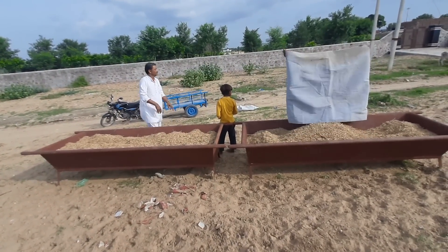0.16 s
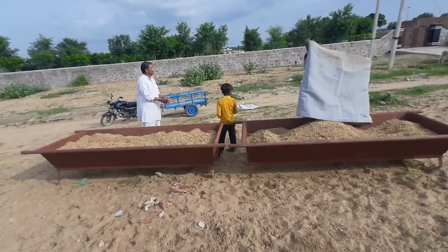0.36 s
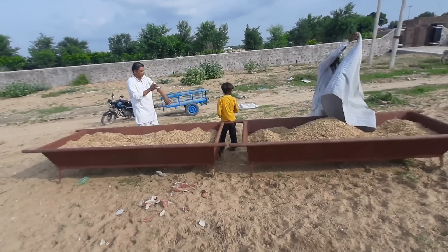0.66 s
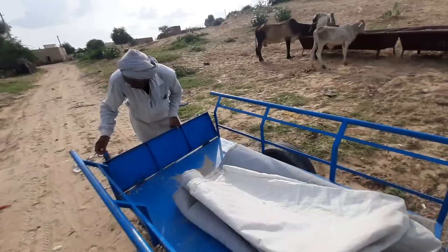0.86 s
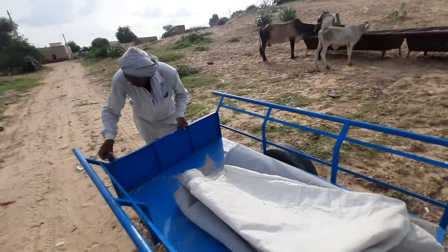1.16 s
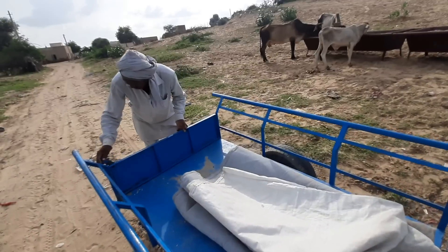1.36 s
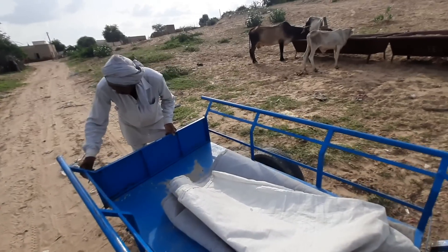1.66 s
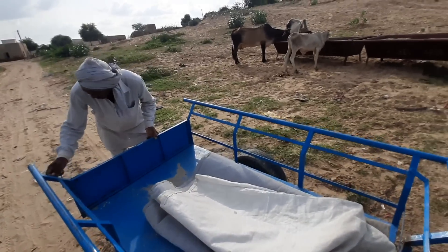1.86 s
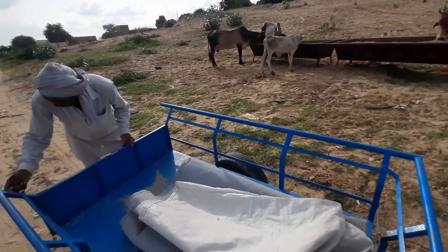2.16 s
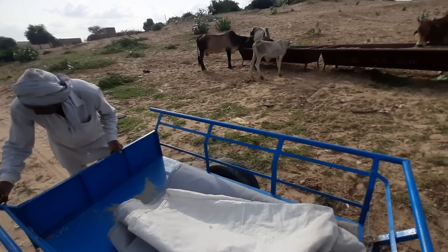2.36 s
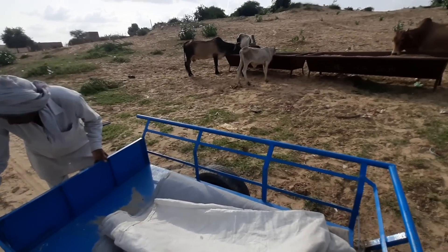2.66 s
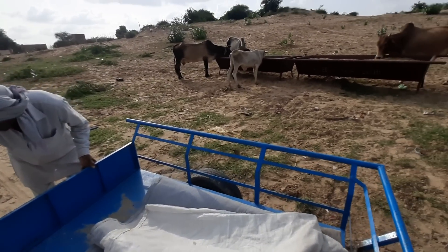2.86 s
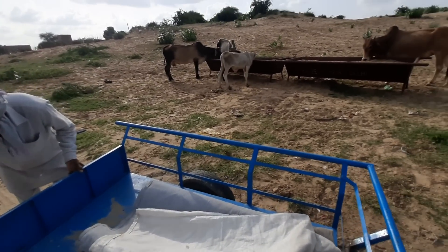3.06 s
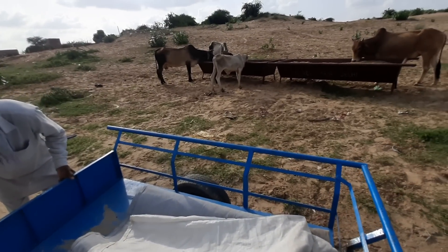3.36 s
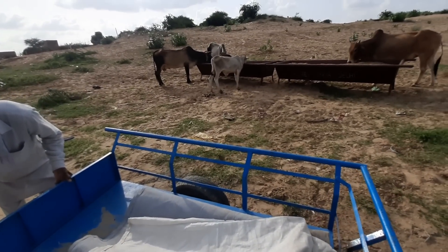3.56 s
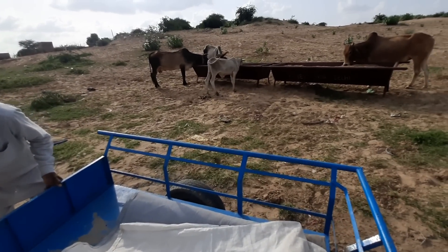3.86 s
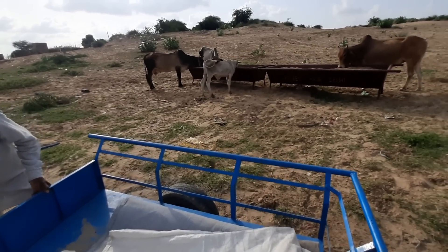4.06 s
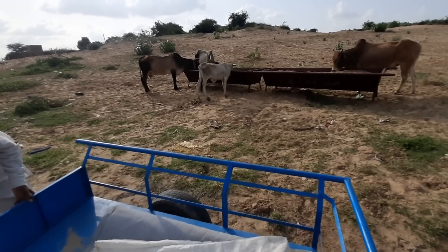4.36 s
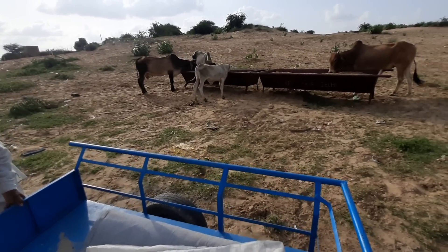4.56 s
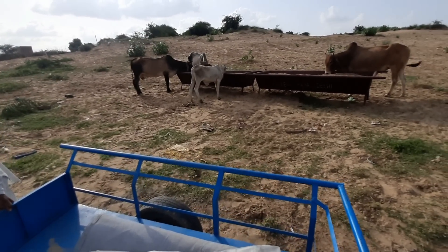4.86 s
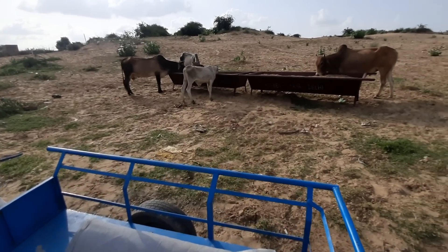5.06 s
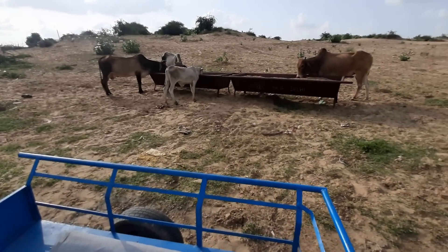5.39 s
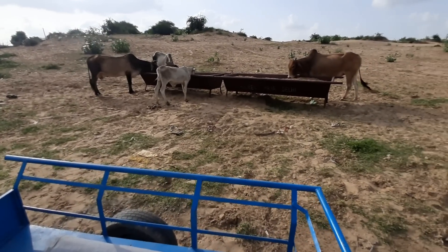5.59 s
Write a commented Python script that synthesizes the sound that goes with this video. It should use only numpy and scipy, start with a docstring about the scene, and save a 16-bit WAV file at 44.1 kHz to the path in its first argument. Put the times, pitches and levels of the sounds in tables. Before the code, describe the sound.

A tarpaulin rustles briefly, then a steel hand cart rattles, clanks and rumbles as it is pushed over rough sand.

```python
"""Tarpaulin, then hand cart

Scene 1: a tarpaulin is shaken out in a yard; weave rustles, creases snap, folds slap. A far engine
revs once, sparrows chirp. Scene 2: a steel hand cart is pushed over rough sand. Wheels rumble, grit
hisses, the bed drones; blows ring sheet, rails, tailgate and axle bar. Far birds cry."""
import sys
import numpy as np
from scipy import signal
from scipy.fft import rfft, irfft, next_fast_len
from scipy.io import wavfile
from scipy.ndimage import uniform_filter1d

SR = 44100
rng = np.random.default_rng(int(sys.argv[2]) if len(sys.argv) > 2 else 0)


def write(x):
    x = np.atleast_2d(x).T
    wavfile.write(sys.argv[1], SR, np.round(np.clip(x, -1, 1) * 32767).astype(np.int16))


N = 252693

YARD_END_S, CART_START_S = 0.7973, 0.818

# Levels are relative within a layer; spectra are densities.
# tarpaulin motion: t/s, rustle/dB, flap/dB
TARP_LEVELS = [(0.0, -67.5, -59), (0.08, -70.5, -60.5), (0.164, -59.5, -56), (0.264, -71.5, -59.5),
               (0.44, -52.5, -53.5), (0.5, -48.5, -56), (0.576, -65.5, -57.5), (0.72, -67, -50),
               (0.79, -47, -49)]
# weave and cloth body: f/Hz, level/dB
RUSTLE_SPECTRUM = [(590, -43), (1000, 0), (1220, -1), (1770, 4), (5250, -2), (5900, -9.5), (8960, -4),
                   (14600, -13), (16000, -20)]
FLAP_SPECTRUM = [(120, -30), (200, 6.5), (302, -8), (361, -13.5), (640, -3.5), (1040, -15.5), (1170, -11.5),
                 (1500, -16.5), (1950, -52), (3300, -120)]
# engine wash: f/Hz, level/dB
ENGINE_SPECTRUM = [(40, -50), (100, 2.5), (250, -7.5), (500, -17.5), (1000, -64)]
# sparrows: start/s, length/s, top f/Hz, level/dB
SPARROW_CHIRPS = [(0.07, 0.087, 5480, -68.5), (0.311, .09, 5480, -71), (0.559, 0.07, 5000, -71)]
# creases: t/s, level/dB
CREASE_SNAPS = [(0.1542, -49.5), (0.4581, -14.5)]
# cloth on cloth: t/s, level/dB, f/Hz
FOLD_SLAPS = [(0.202, -46.5, 676), (0.522, -36.5, 301), (0.654, -56, 550), (0.685, -38.5, 650),
              (0.739, -49, 750)]
# wheels on sand: t/s, rumble/dB, grit/dB
ROLL_LEVELS = [(0.82, -53, -60), (1.05, -52.5, -60.5), (1.19, -37, -47), (1.35, -42.5, -50),
               (1.5, -46.5, -57), (1.9, -51.5, -57.5), (2.05, -53, -63), (2.76, -56, -62),
               (3.05, -45.5, -59), (3.25, -44.5, -59.5), (3.55, -52, -57.5), (3.66, -43, -52),
               (4.09, -55, -67.5), (4.42, -42, -53.5), (4.58, -44.5, -65.5), (4.94, -42.5, -57),
               (5.28, -51, -74.5), (5.46, -46, -70), (5.73, -54.5, -74)]
# wheels and sand: f/Hz, level/dB
RUMBLE_SPECTRUM = [(12, -46.5), (20, -35), (91, 11), (117, 4), (134, -23), (236, -30.5), (258, -24),
                   (292, -11), (400, -38.5), (520, -60), (880, -120)]
GRIT_SPECTRUM = [(88, -33.5), (150, -13), (179, -21), (217, -7), (398, -16.5), (439, -30.5), (534, -28.5),
                 (1480, -39.5), (2310, -43.5), (8900, -48), (16000, -62)]
THUD_SPECTRUM = [(20, -28.5), (45, -2), (80, 3.5), (130, -9.5), (300, -60)]
# bumps: t/s, level/dB
WHEEL_THUDS = [(1.309, -41), (3.091, -34), (4.94, -35), (5.45, -44)]
# left-right coherence: f/Hz, coherence/1
RUMBLE_COHERENCE = [(25, 0.38), (60, 0.7), (150, 0.9)]
CLANK_COHERENCE = [(60, .9), (180, .995), (350, .99), (700, .96), (1200, .7), (2500, .6), (5000, .75),
                   (8000, .85)]
# bed panel swells: peak t/s, level/dB, f/Hz, swell/s, t60/s
BED_SWELLS = [(0.85, -38.5, 208, 0.066, 0.23), (.97, -46.5, 215, 0.068, 1.2),
              (1.145, -24, 214.4, 0.089, 1.2), (1.223, -22, 206, .04, 0.12), (1.341, -26, 234, .05, 0.38),
              (1.431, -33.5, 212.4, .04, 0.24), (1.52, -32.5, 198, 0.05, 0.27),
              (1.69, -20, 220, 0.021, 0.13), (1.8, -41, 213.7, .02, 0.65),
              (2.33, -35.5, 221.2, 0.031, 0.85), (2.375, -37.5, 230, .04, 0.086),
              (2.51, -37.5, 221.2, 0.043, .35), (3.05, -43.5, 215, 0.045, 0.71),
              (3.23, -26, 214.5, 0.12, 0.24), (3.4, -39, 217, 0.044, 0.46), (3.61, -32.5, 210, 0.036, 0.41),
              (4.22, -27, 216, 0.028, 1), (4.409, -36.5, 219, 0.076, 0.33),
              (4.95, -12, 189.6, 0.024, 0.039), (5.0, -28, 196, .02, 0.36)]
# blows: t/s, clang/dB, boom/dB, jangle/dB, top-octave loss/dB, lean from tailgate to rails/dB,
# treble damping/(dB per 0.1 s, sign ignored)
CART_BLOWS = [(0.9012, -70, -39, -55.5, 12, 4.5, 20), (1.163, -41, -16, -34, 16, 8.5, 11),
              (1.1839, -24, -10.5, -25, 7, -9.5, -3), (1.1998, -18.5, -24.5, -10, 13, -12, 0),
              (1.2107, -38, -16, -24, 25, -1, 8), (1.2589, -23.5, -23, -22.5, 17, 0, 11),
              (1.3215, -41, -25, -35, 30, 6, -6), (1.3789, -49.5, -32, -37, 25, 5, 31),
              (1.431, -38, -34, -50, 33, -12, 26), (1.5094, -32, -25, -36, 27, -12.5, 17),
              (1.5322, -42, -46, -45, 6, -6, -5), (1.558, -40, -43.5, -46, 32, -15, 5),
              (1.61, -36.5, -27.5, -30.5, 23.5, 2, 20), (1.6786, -20.5, -19.5, -15, 7, 10, 6.5),
              (1.7005, -22, -22.5, -14.5, 20.5, -13.5, 19), (1.7386, -39, -21, -34.5, 27, -0.5, 22.5),
              (2.3098, -46.5, -29.5, -35.5, 16.5, -0.5, 4), (2.4723, -35, -35, -26, 10.5, 4, 9.2),
              (3.0191, -34, -20, -35.5, 7, -2.5, 12), (3.0487, -43, -32, -56, 25, 7.5, 9),
              (3.1006, -33, -36, -25, 23, 2.5, 20), (3.1372, -33, -29, -33, 46, 4, 2),
              (3.175, -30, -29, -34, 18, -13.5, 11), (3.1942, -31.5, -22.5, -33.5, 39, -11.5, 23),
              (3.2648, -54, -32, -65, -2.5, -17, 5), (3.3794, -41.5, -29.5, -51.5, 3, 3, 4.5),
              (3.502, -49.5, -40, -42.5, 5, 2, 5), (3.5834, -40, -27, -38, 15, -4, 9),
              (3.864, -66.5, -69, -56.5, 16.5, 2, 6.5), (4.2046, -30, -22.5, -21, 20.5, -4, 12.5),
              (4.354, -41, -26, -43, 14, -2, 6), (4.5103, -68, -42, -55, 8.5, 6, 4),
              (4.6122, -53, -42, -36, 8, 1, 16), (4.7638, -59, -59.5, -52.5, 6, -2.5, 11),
              (4.9163, -29, -21.5, -8.5, 6.5, 3, 13), (4.934, -17, -21.5, -21.5, 26, 1.5, 21),
              (4.9498, -23, -21.5, -15, 29, -2.5, 10), (5.0174, -42.5, -29, -35.5, 17, 12, 3),
              (5.0728, -43.5, -37.5, -43, 10, 9, 16.5), (5.099, -61, -31.5, -47.5, 11, -0.5, 10),
              (5.2673, -89.5, -46, -60.5, 20, -5.5, 10.5)]
# envelope of the dense sheet modes: f/Hz, level/dB, t60/s before blow damping
SHEET_RESPONSE = [(121, -4.5, 0.8), (257, -0.5, 0.91), (464, 1.5, 0.49), (1140, 9.5, 0.3), (2200, 7, 0.35),
                  (3500, 0, 0.23), (4407, -4, 0.18), (6000, -2, .15), (8300, 6, 0.15), (14000, 4.5, 0.13),
                  (16000, -17.5, .08)]
# frame modes: f/Hz, level/dB, t60/s before blow damping
RAIL_MODES = [(183, -1, .45), (213, 0, .5), (260, -4, .35), (305, -4, .35), (452, -6, .4), (705, -4, .3),
              (915, -8, .25), (1125, -9, .22), (1780, -8, .14), (1884, -10, .2), (2503, -8, .13),
              (2902, -10, .14), (3550, -6, .07), (3740, -8, .08), (5265, -10, .09), (6848, -10, .09),
              (8050, -8, .07), (9300, -8, .07)]
GATE_MODES = [(328, -4, .35), (375, -3, .4), (527, -5, .3), (709, -4, .3), (1055, -6, .22),
              (1342, -10, .22), (1379, -8, .22), (2220, -11, .18), (2675, -12, .18), (2947, -11, .15),
              (7503, -10, .12), (8555, -2, .13), (10270, -6, .16)]
# right-channel lag as the cart moves left: t/s, lag/ms
RIGHT_LAG = [(.8, .2), (3, .27), (5.7, .41)]
# steel on steel: start/s, end/s, end level/dB
STEEL_SCRAPES = [(1.175, 1.203, -21), (3.128, 3.193, -33), (3.366, 3.375, -49), (4.178, 4.214, -28.5),
                 (4.326, 4.36, -38), (4.908, 4.916, -43)]
# steel friction: f/Hz, level/dB
SCRAPE_SPECTRUM = [(300, -23), (900, -5), (2200, 1), (3500, -2.5), (5000, -17.5), (9000, -14.5),
                   (14000, -27)]
# latch pins and links: t/s, f/Hz, level/dB
PIN_CLINKS = [(1.314, 3050, -33.5), (2.312, 5600, -48), (3.103, 3010, -31), (3.105, 3600, -31.5),
              (3.191, 3700, -43), (3.504, 9000, -51), (4.186, 1810, -35), (4.207, 3400, -35),
              (5.072, 1790, -36.5), (5.268, 4690, -64.5)]
# far birds: start/s, length/s, top f/Hz, level/dB
FAR_CRIES = [(1.836, 0.22, 1750, -66), (2.072, 0.25, 1700, -75), (2.564, 0.2, 1740, -65),
             (2.707, 0.24, 1780, -67), (3.68, 0.26, 2050, -68), (3.927, 0.17, 2150, -78),
             (4.45, 0.16, 1850, -72), (4.602, 0.12, 2060, -64.5), (4.749, .15, 1800, -71),
             (5.198, 0.23, 1700, -79), (5.611, 0.17, 1880, -69.5)]
# blur around the cries: f/Hz, level/dB
CRY_SPECTRUM = [(900, -32.5), (1250, -7.5), (1800, 0.5), (2250, -5.5), (2700, -27.5)]
# hollow knock: t/s, level/dB
HOLLOW_KNOCKS = [(2.7, -41.5)]
# hollow part and axle bar modes: f/Hz, level/dB, t60/s
HOLLOW_MODES = [(590, -13.5, 0.24), (840, -5.5, 0.34), (1010, 6.5, 0.19), (1130, 0, 0.29),
                (1100, -1.5, 0.31), (1240, -6, 0.12), (1376, -4.5, .12), (1600, -12, 0.091)]
AXLE_MODES = [(1502, -6, .5), (4452, -12, .45), (4470, -16, .4), (5987, 0, .17)]
# blows on the axle bar: t/s, level/dB, top-mode gain/dB
AXLE_BLOWS = [(4.6148, -62.5, -23), (4.922, -32.5, 12)]
# one bird's falling call: t/s, f/Hz, level/dB
FALLING_CALL = [(5.22, 1863, -77.5), (5.308, 1857, -85), (5.354, 1695, -77.5), (5.52, 1560, -94)]
# stereo balance: f/Hz, left minus right/dB
STEREO_TILT = [(60, -0.5), (110, -0.5), (200, -0.5), (380, 0.5), (700, 0.5), (1290, -2.5), (2380, 0.5),
               (4400, -4), (8120, -4.5), (15000, 14)]


def amp(db):
    return 10 ** (np.asarray(db) / 20)


def unit_rms(x):
    return x / np.sqrt(np.mean(x ** 2) + 1e-20)


def at_hz(table, hz, column=1):
    """Table column, interpolated over log frequency."""
    table = np.array(table)
    return np.interp(np.log(hz + 1), np.log(table[:, 0] + 1), table[:, column])


def track(table):
    """Columns of a time table, per sample."""
    times_s, *columns = np.transpose(table)
    return [np.interp(np.arange(N) / SR, times_s, c) for c in columns]


def add(mix, at_s, sound):
    part = mix[:, round(at_s * SR):][:, :sound.shape[1]]
    part += sound[:, :part.shape[1]]


def stereo(left, other, coherence):
    return np.array([left, coherence * left + np.sqrt(1 - coherence ** 2) * other])


def noise(spectrum, coherence, size=512, patchy_db=-0.5, flicker_db=0):
    """Coloured stereo noise with drifting patches and wide-band flicker."""
    hop = size // 4
    hz = np.fft.rfftfreq(size, 1 / SR)
    a, b, c, d, patches = rng.standard_normal((N // hop + 5, len(hz), 5)).T
    flicker = patches[0]
    patches = unit_rms(uniform_filter1d(uniform_filter1d(patches, 8, axis=0), 12, axis=1))
    bins = stereo(a + 1j * b, c + 1j * d, np.reshape(coherence, (-1, 1)))
    bins *= amp(at_hz(spectrum, hz)[:, None] + patchy_db * patches + flicker_db * flicker)
    return unit_rms(signal.istft(bins, nperseg=size, noverlap=size - hop)[1][:, :N])


def swell(peak_s, db, swell_s, t60_s):
    """Gain: quadratic rise, exponential decay."""
    t = np.arange(N) / SR - peak_s
    return amp(db - 60 * np.maximum(t, 0) / t60_s) * np.clip(1 + t / swell_s, 0, 1) ** 2


def ring(modes, t):
    """Decaying sines, random phases."""
    return sum(amp(db - 60 * t / t60_s) * np.sin(2 * np.pi * (hz * t + rng.random()))
               for hz, db, t60_s in modes)


def arched_note(start_s, length_s, hz, db, arch, rise_db, fall_db, top=0.55):
    """Pitch and level climb, then sink. Rows: t/s, f/Hz, level/dB."""
    return [(start_s, hz * (1 - arch), db - rise_db),
            (start_s + top * length_s, hz, db),
            (start_s + length_s, hz * (1 - 1.4 * arch), db - fall_db)]


def note_gain(note):
    t = np.arange(N) / SR
    inside_s = np.minimum(t - note[0][0], note[-1][0] + 0.025 - t)
    return amp(track(note)[1]) * np.clip(inside_s / 0.017, 0, 1)


def fuzzy_tone(notes, width_hz):
    """Narrow noise band following the notes."""
    hz = track(np.concatenate(notes))[0]
    pole = np.exp(-np.pi * width_hz / SR)
    white = rng.standard_normal(N) + 1j * rng.standard_normal(N)
    fuzz = signal.lfilter([1], [1, -2 * pole, pole ** 2], white)
    carrier = np.exp(2j * np.pi * np.cumsum(hz) / SR)
    return sum(map(note_gain, notes)) * unit_rms((fuzz * carrier).real)


def tarpaulin():
    """Plastic weave crackles over soft flaps of the cloth body."""
    rustle_db, flap_db = track(TARP_LEVELS)
    rustle = amp(rustle_db) * noise(RUSTLE_SPECTRUM, 0.067, size=256, patchy_db=4.5, flicker_db=-1.5)
    return rustle + amp(flap_db) * noise(FLAP_SPECTRUM, 0.79, size=1024, patchy_db=7.5)


def engine(idle_hz=130.4, rev_hz=158.9, rev_s=0.19, rev_width_s=0.09, fade_db_per_s=4):
    """Two firing orders in a dull wash; one throttle swell lifts pitch and level."""
    t = np.arange(N) / SR
    rev = np.exp(-((t - rev_s) / rev_width_s) ** 2)
    phase = 2 * np.pi * np.cumsum(idle_hz + (rev_hz - idle_hz) * rev) / SR
    orders = np.sin(phase) + amp(-3) * np.sin(1.45 * phase)
    gain = np.sqrt(2) * amp(-60 + 5.5 * rev - fade_db_per_s * t)
    return gain * orders + amp(-59.5) * noise(ENGINE_SPECTRUM, 0.78, size=2048)


def sparrows():
    """Short, high, arched chirps."""
    notes = [arched_note(*row, arch=0.18, rise_db=11, fall_db=2, top=0.52) for row in SPARROW_CHIRPS]
    return fuzzy_tone(notes, width_hz=400)


def crease_snaps(click_hz=2600):
    """A crease snaps: click plus short noise tail."""
    out, t = np.zeros((2, N)), np.arange(400) / SR
    highpass = signal.butter(2, 1200, "high", fs=SR)
    for at_s, db in CREASE_SNAPS:
        click = np.exp(-t / 0.00021) * np.cos(2 * np.pi * click_hz * t)
        tail = 0.17 * np.exp(-t / 0.0031) * rng.standard_normal((2, len(t)))
        add(out, at_s, amp(db + 6.5) * signal.lfilter(*highpass, click + tail))
    return out


def fold_slaps():
    """Dull puffs where folds meet."""
    out, t = np.zeros((2, N)), np.arange(3000) / SR
    envelope = (1 - np.exp(-t / 0.0015)) * np.exp(-t / 0.015)
    for at_s, db, hz in FOLD_SLAPS:
        bandpass = signal.butter(2, [hz * 0.59, hz * 1.16], "band", fs=SR)
        puff = unit_rms(signal.lfilter(*bandpass, rng.standard_normal(len(t))))
        add(out, at_s, amp(db - 7.5) * puff[None] * envelope)
    return out


def wheels():
    """Wheels rumble through sand and thud over bumps."""
    rumble_db, _ = track(ROLL_LEVELS)
    coherence = at_hz(RUMBLE_COHERENCE, np.fft.rfftfreq(2048, 1 / SR))
    rumble = amp(rumble_db) * noise(RUMBLE_SPECTRUM, coherence, size=2048, patchy_db=1)
    bumps = sum(swell(at_s, db, swell_s=0.03, t60_s=0.25) for at_s, db in WHEEL_THUDS)
    return rumble + bumps * noise(THUD_SPECTRUM, 0.5, size=2048)


def bed_drone(hum_hz=217, hum_db=-62, sag_hz_per_s=200):
    """Lowest panel mode of the bed: constant hum, plus swells that sag in pitch as they grow."""
    t = np.arange(N) / SR
    drone = fuzzy_tone([[(CART_START_S, hum_hz, hum_db), (t[-1], hum_hz, hum_db)]], width_hz=25)
    for peak_s, db, hz, swell_s, t60_s in BED_SWELLS:
        cycles = hz * (t - peak_s) - sag_hz_per_s * np.minimum(t - peak_s, 0) ** 2 / 2
        drone += swell(peak_s, db, swell_s, t60_s) * np.sin(2 * np.pi * cycles)
    return drone


def grit(shiver_db=-20, shiver_t60_s=0.5):
    """Sand hisses; loose parts shiver after each blow, in step with its boom."""
    _, grit_db = track(ROLL_LEVELS)
    kicks = np.zeros((1, N))
    for at_s, _, boom_db, *_ in CART_BLOWS:
        add(kicks, at_s, amp([[boom_db + shiver_db]]) ** 2)
    shiver_power = signal.lfilter([1], [1, -amp(-60 / shiver_t60_s / SR) ** 2], kicks)
    gain = amp(2.5) * np.sqrt(amp(grit_db) ** 2 + shiver_power)
    return gain * noise(GRIT_SPECTRUM, 0.43, patchy_db=3)


def clanks(bass_count=90, damping_db_per_s=25, band_hz=(300, 1000, 2500, 5500, 11000)):
    """Each blow excites a new mix of dense sheet modes and rings rails and tailgate."""
    out, t = np.zeros((2, N)), np.arange(round(0.4 * SR)) / SR
    grid_hz = np.r_[np.geomspace(110, 1500, bass_count), np.linspace(1520, 16300, 600)]
    step_hz = np.gradient(grid_hz)
    sheet_hz = grid_hz + step_hz * rng.uniform(-0.5, 0.46, len(grid_hz))
    sheet_gain = amp(at_hz(SHEET_RESPONSE, sheet_hz))
    sheet_gain *= np.sqrt(step_hz / grid_hz)  # offsets mode density per octave
    sheet_t60_s = at_hz(SHEET_RESPONSE, sheet_hz, column=2) * rng.uniform(0.7, 1.3, len(grid_hz))
    frame_hz, frame_db, frame_t60_s = np.transpose(RAIL_MODES + GATE_MODES)
    lean_sign = np.repeat([1, -1], [len(RAIL_MODES), len(GATE_MODES)])
    hz, t60_s = np.r_[sheet_hz, frame_hz], np.r_[sheet_t60_s, frame_t60_s]
    bass, treble, frame = slice(bass_count), slice(bass_count, len(grid_hz)), slice(len(grid_hz), None)
    cycles = np.outer(hz, t)
    onset = 1 - np.exp(-(cycles / 2.2) ** 2)  # heavy panels need a few cycles to move
    modes = (onset * amp(-60 * t / t60_s[:, None]) * np.exp(2j * np.pi * cycles)).astype(np.complex64)
    window = (1 - np.exp(-t / 0.0033)) * np.clip((t[-1] - t) / 0.093, 0, 1)
    draws = rng.standard_normal((len(CART_BLOWS), 5, len(hz)))
    for blow, (a, b, c, d, spot) in zip(CART_BLOWS, draws):
        at_s, clang_db, boom_db, jangle_db, dull_db, lean_db, treble_damping = blow
        left = a + 1j * b
        left[frame] /= abs(left[frame])
        weights = stereo(left, c + 1j * d, at_hz(CLANK_COHERENCE, hz))
        weights *= amp(4.2 * spot * (hz > 1500) - 2.2)  # strike point favours some treble modes
        upper_clang_db = clang_db - 3.5 + 0.22 * (jangle_db - clang_db)
        band_db = [boom_db, clang_db, upper_clang_db, jangle_db, jangle_db - dull_db]
        weights *= amp(np.interp(np.log(hz), np.log(band_hz), band_db) - 5.5)
        weights *= np.r_[sheet_gain, amp(frame_db - 5.5 + lean_sign * lean_db)]
        weights = weights.astype(np.complex64)
        low, high, rings = ((weights[:, part] @ modes[part]).real for part in (bass, treble, frame))
        crack = 1 + max(2.2 - 0.08 * dull_db, 0) * np.exp(-t / 0.0059)  # dull blows crack less
        chatter_db = unit_rms(uniform_filter1d(rng.standard_normal(len(t)), 60))  # loose parts
        high *= crack * amp(chatter_db - abs(treble_damping) * 10 * t)
        low = 0.71 * low + 0.23 * low.mean(0)
        sound = window * ((low + rings) * amp(-damping_db_per_s * t) + high)
        lag_ms = np.interp(at_s, *np.transpose(RIGHT_LAG))
        sound[1] = np.roll(sound[1], round(lag_ms * SR / 1000))
        add(out, at_s, sound)
    return out


def scrapes():
    """Steel drags on steel, growing louder up to a blow."""
    t = np.arange(N) / SR
    gain = sum(amp(db) * np.interp(t, [start_s, end_s, end_s + 0.015], [0, 1, 0]) ** 2
               for start_s, end_s, db in STEEL_SCRAPES)
    return gain * noise(SCRAPE_SPECTRUM, 0.46, size=256, patchy_db=4.5, flicker_db=4)


def clinks(t60_s=0.06, pair_ratio=1.04):
    """Pins and links ping; two close modes beat."""
    out, t = np.zeros((2, N)), np.arange(8000) / SR
    for at_s, hz, db in PIN_CLINKS:
        pair = sum(np.sin(2 * np.pi * (hz * ratio * t + rng.random((2, 1)))) for ratio in (1, pair_ratio))
        add(out, at_s, amp(db - 60 * t / t60_s) * (1 - np.exp(-t / 0.002)) * pair)
    return out


def far_birds():
    """Arched cries in a blurred band; one falling call."""
    cries = [arched_note(*row, arch=0.038, rise_db=2.5, fall_db=8.5) for row in FAR_CRIES]
    blur = sum(map(note_gain, cries)) * noise(CRY_SPECTRUM, 0.23, patchy_db=1)
    voices = fuzzy_tone(cries, width_hz=280)
    return amp(-7) * voices + amp(1) * blur + fuzzy_tone([FALLING_CALL], width_hz=50)


def hollow_knock(flutter_db=5):
    """A hollow part rings with a soft onset; the level flutters."""
    out, t = np.zeros((2, N)), np.arange(8000) / SR
    onset = 1 - np.exp(-(t / 0.013) ** 2)
    for at_s, db in HOLLOW_KNOCKS:
        tone = ring(HOLLOW_MODES, t)
        flutter = uniform_filter1d(uniform_filter1d(rng.standard_normal((2, len(t))), 150), 150)
        add(out, at_s, amp(db - 6.5 + flutter_db * unit_rms(flutter)) * onset * tone)
    return out


def axle_bar():
    """The struck bar rings clear, louder on the right."""
    out, t = np.zeros((2, N)), np.arange(SR // 2) / SR
    onset, pan = 1 - np.exp(-t / 0.004), amp([[-3], [3]])
    for at_s, db, top_db in AXLE_BLOWS:
        modes = [(hz, mode_db + top_db * (hz > 5000), t60_s) for hz, mode_db, t60_s in AXLE_MODES]
        add(out, at_s, amp(db) * pan * onset * ring(modes, t))
    return out


def scene():
    """Yard, brief hush, cart; birds in both scenes."""
    t = np.arange(N) / SR
    yard_gate = np.clip((YARD_END_S - t) / 0.0057, amp(-32), 1) * (t < CART_START_S)
    cart_gate = np.clip((t - CART_START_S) / 0.004, 0, 1)
    yard = tarpaulin() + crease_snaps() + fold_slaps() + engine()
    cart = clanks() + axle_bar() + scrapes() + hollow_knock()
    cart += wheels() + bed_drone() + grit() + clinks()
    birds = far_birds() + sparrows()
    return yard_gate * yard + cart_gate * cart + np.maximum(yard_gate, cart_gate) * birds


def record(dry):
    """Left-right tilt, soft clip, low-pass."""
    ceiling, cutoff_hz = 0.85, 16300
    size = next_fast_len(N + 4096)
    left_gain = amp(at_hz(STEREO_TILT, np.fft.rfftfreq(size, 1 / SR)) / 2)
    tilted = irfft(rfft(dry, size) * np.array([left_gain, 1 / left_gain]), size)[:, :N]
    clipped = ceiling * np.tanh(tilted / ceiling)
    lowpass = signal.firwin(255, cutoff_hz, window=("kaiser", 9), fs=SR)
    return signal.oaconvolve(clipped, lowpass[None], "same")


dry = scene()
out = record(dry)
write(out)
```